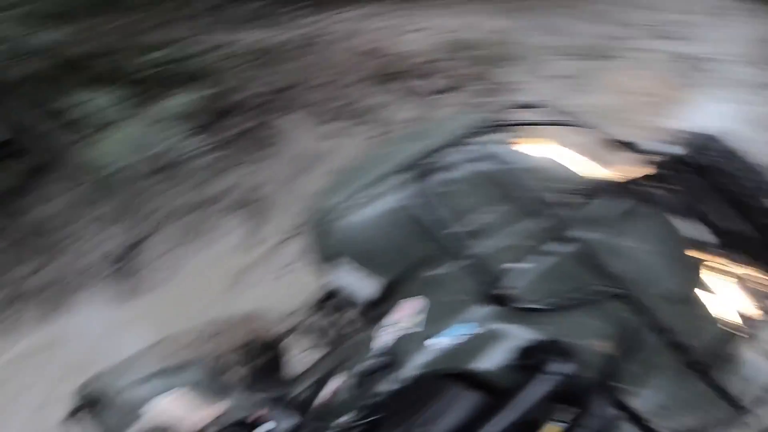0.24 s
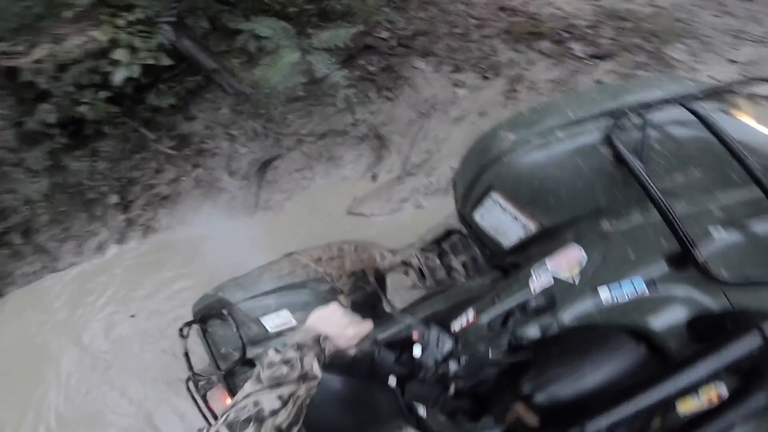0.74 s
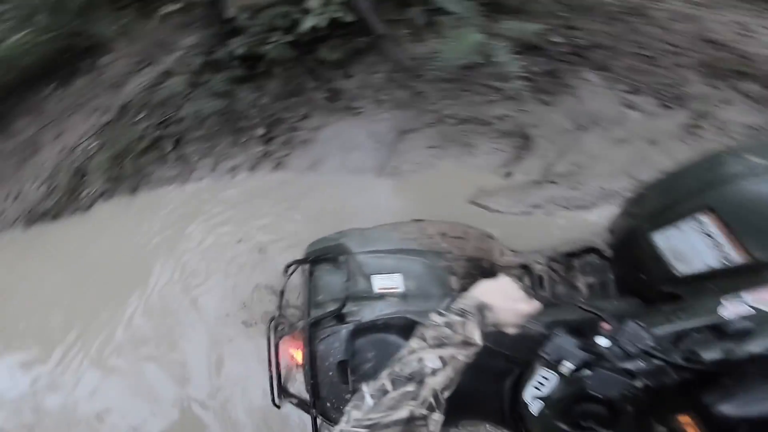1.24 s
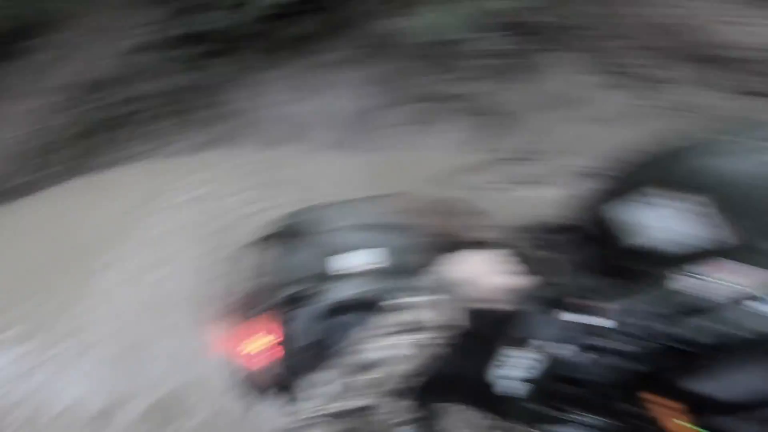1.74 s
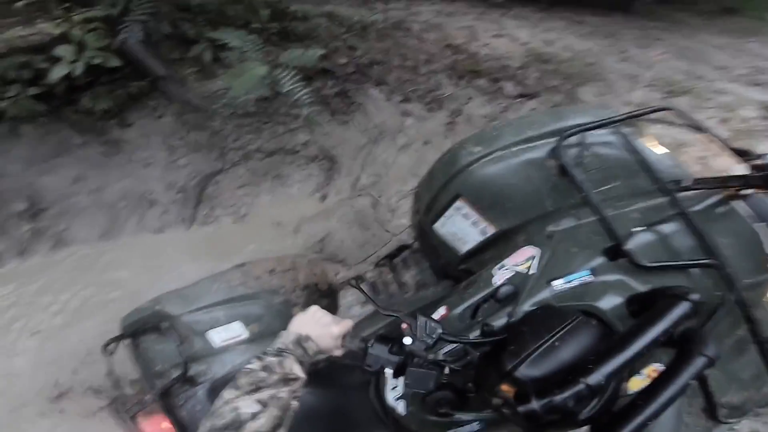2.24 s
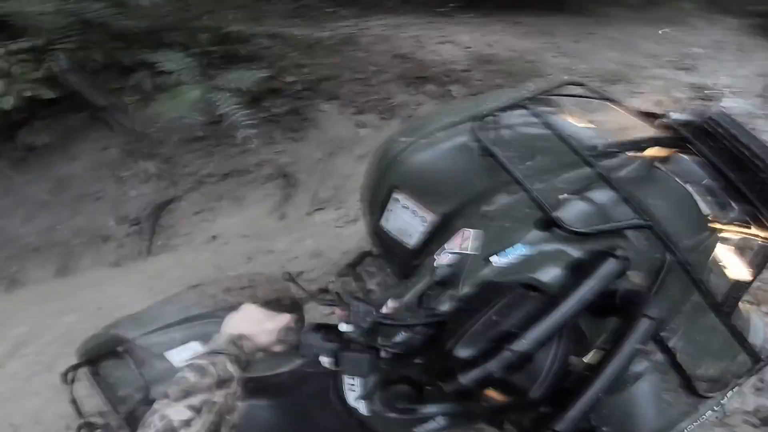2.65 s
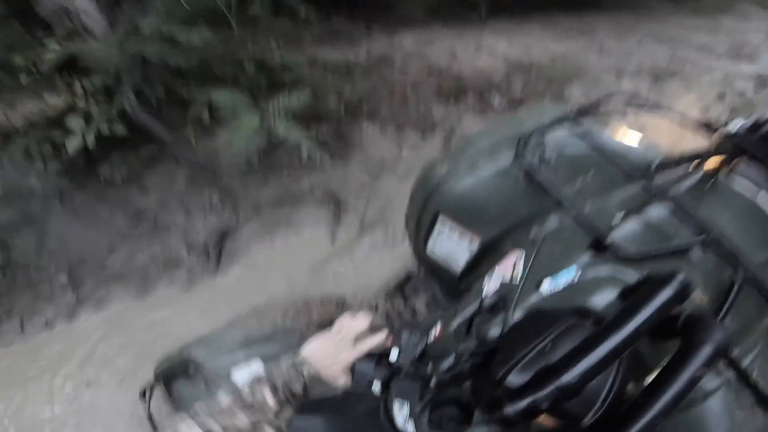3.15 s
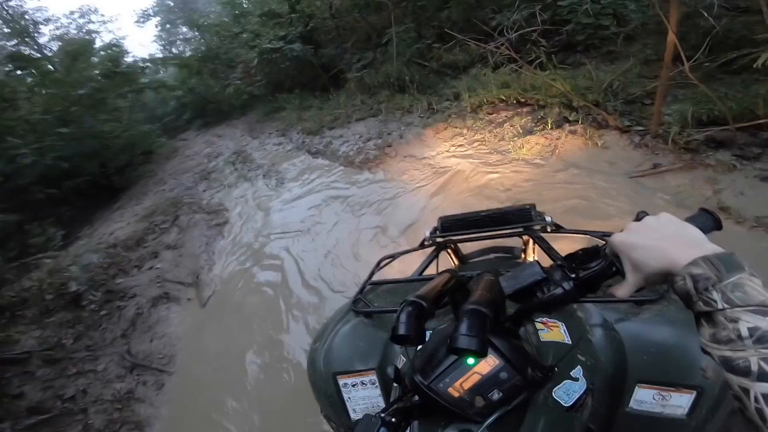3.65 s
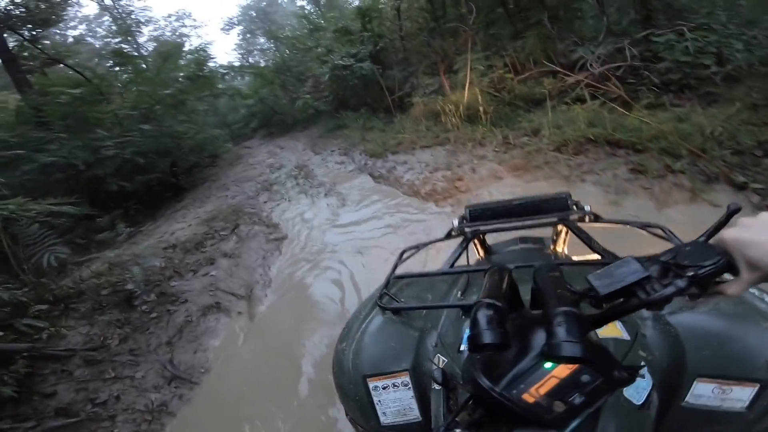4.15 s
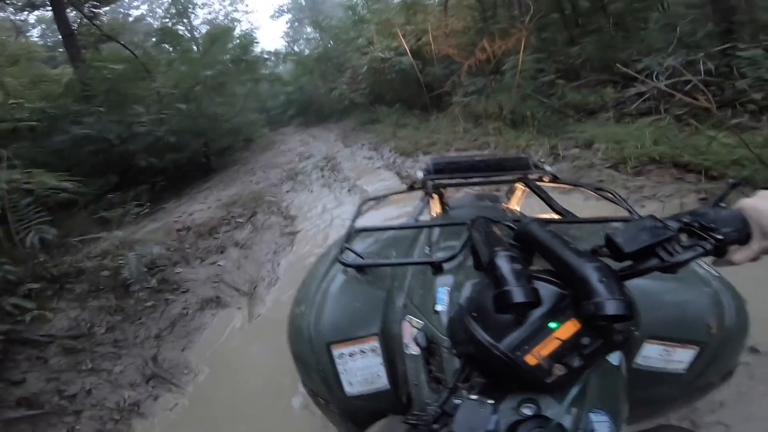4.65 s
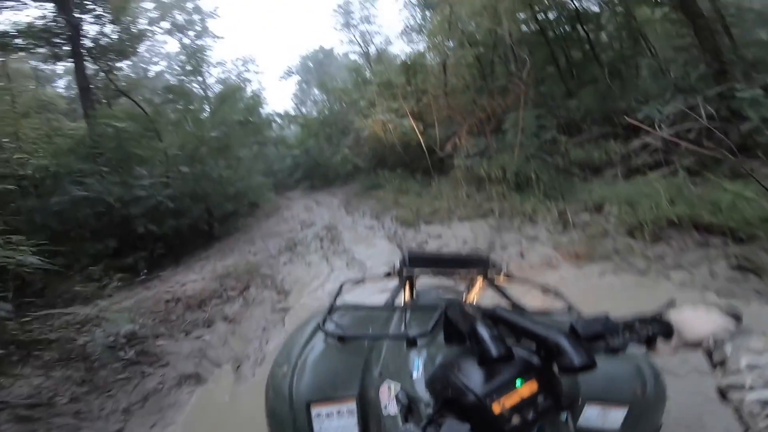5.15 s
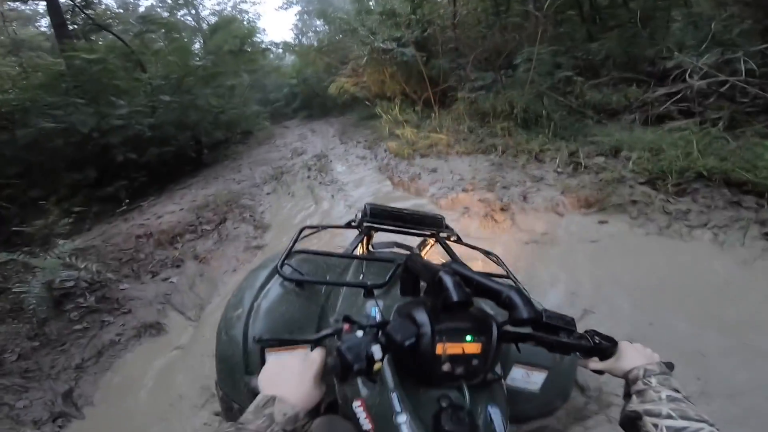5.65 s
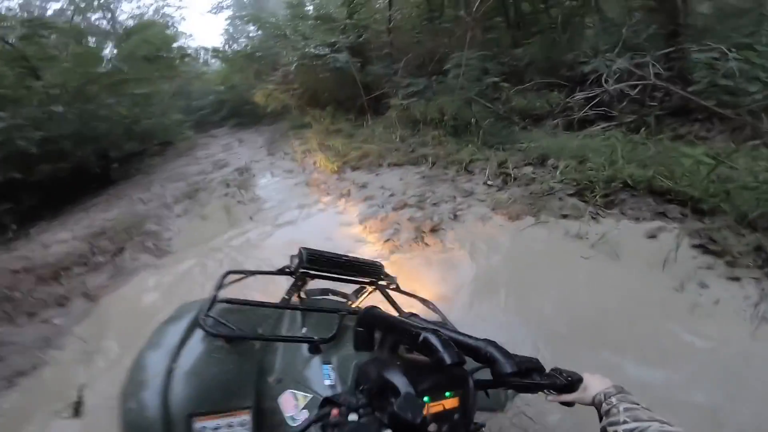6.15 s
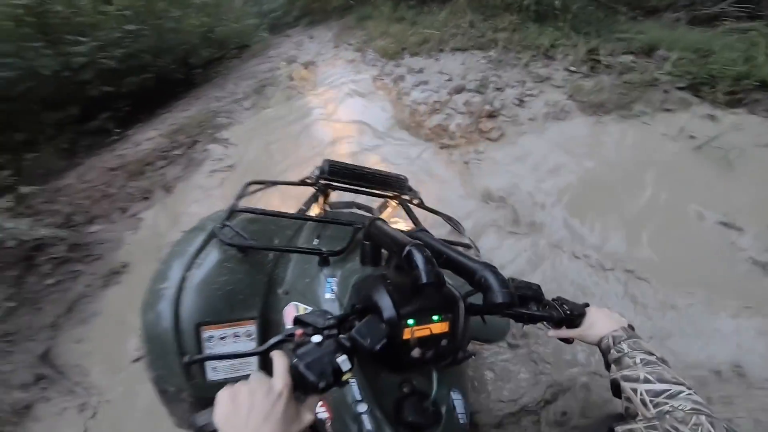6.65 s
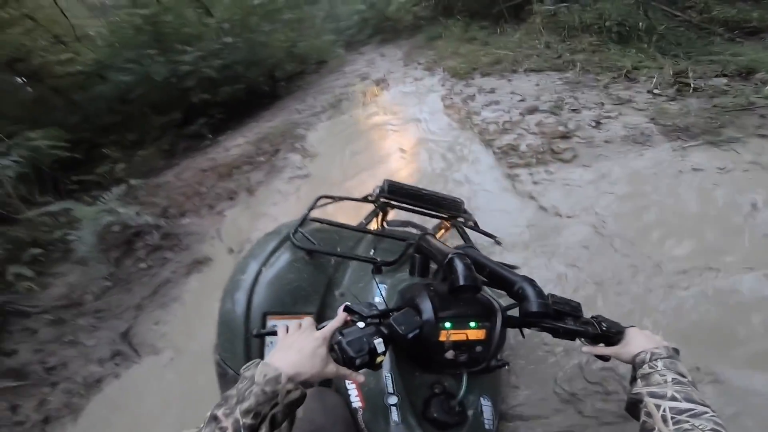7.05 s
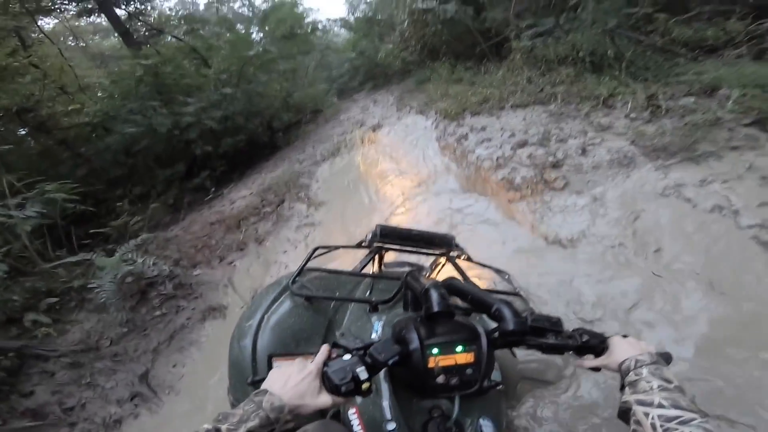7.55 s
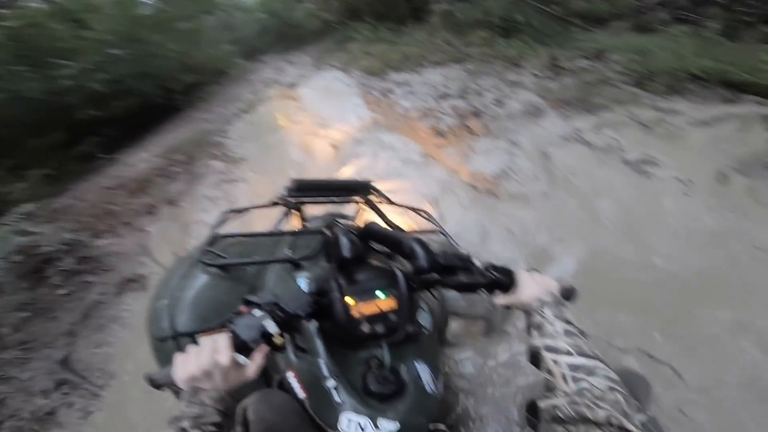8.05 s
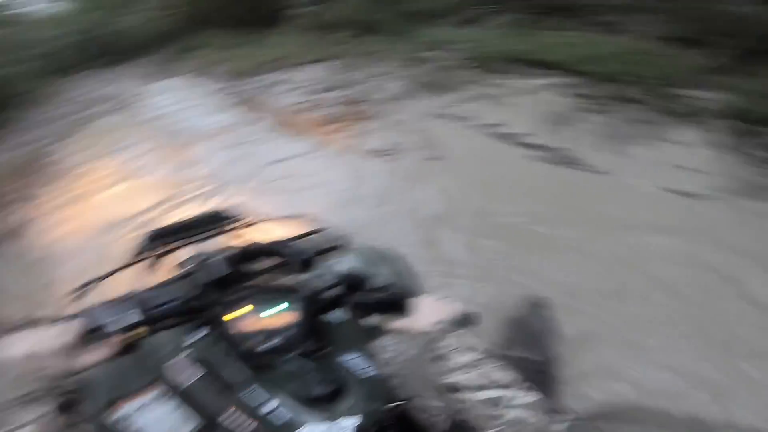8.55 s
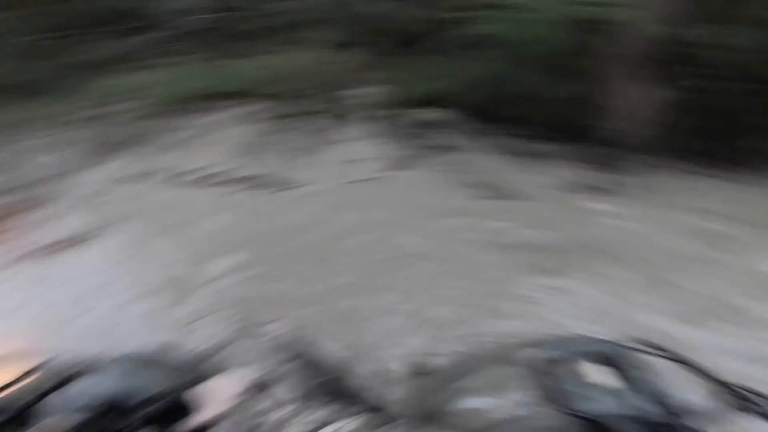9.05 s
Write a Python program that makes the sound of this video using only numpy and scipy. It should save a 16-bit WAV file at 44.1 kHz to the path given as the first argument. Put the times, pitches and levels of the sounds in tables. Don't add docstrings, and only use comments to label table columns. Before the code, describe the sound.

A small single-cylinder quad thumps and bubbles with its tailpipe underwater, chokes to a rough idle, then barks clear and putters gently through sloshing mud.

```python
import sys
import numpy as np
from scipy import signal
from scipy.fft import rfft, irfft, next_fast_len
from scipy.io import wavfile
from scipy.ndimage import uniform_filter1d, map_coordinates

SR = 44100
rng = np.random.default_rng(int(sys.argv[2]) if len(sys.argv) > 2 else 0)


def ratio(d):
    e = np.asarray(d, float) / 20
    return 10 ** e


def dump_mix(stems):
    frames = np.atleast_2d(stems).T
    limited = np.clip(frames, -1, 1)
    pcm = np.round(limited * 32767).astype(np.int16)
    wavfile.write(sys.argv[1], SR, pcm)


N = 410130

# [time_s, firings_per_s]
ENGINE_SPEED = [(-.0045, 19.227), (.576, 17.406), (2.121, 26.896), (2.257, 16.675), (2.711, 10.965),
                (3.676, 12.659), (3.681, 22.407), (4.186, 24.499), (4.315, 17.466), (4.676, 19.918),
                (4.751, 17.301), (5.184, 24.733), (5.437, 14.525), (6.383, 11.086), (7.701, 11.692),
                (7.901, 18.243), (8.647, 19.506), (9.33, 17.243)]
# [time_s, late_ms]
CRANK_HUNT = [(0, 0), (.05, -4), (.2, -1), (.35, 5), (.55, 2), (.72, -2), (.85, 1), (1.05, -2), (1.2, -3),
              (1.38, 3), (1.55, 0), (1.65, 3), (1.86, 2.5), (2, 0), (5.9, 0), (6.3, 3), (6.9, 2), (7.3, 0)]
# [time_s, late_ms, pitch_share]
HESITATIONS = [(2.09, 3, 1), (2.13, 4, 1), (2.17, 7, .78), (2.22, 16, 1), (2.41, -6, 1), (2.47, 0, 1),
               (2.54, 4, 1), (2.71, -2, 1), (2.8, -6, 1), (2.89, 10, 1), (3.7, -3, 1), (4.25, 0, .72),
               (4.31, -3, .9), (4.37, -3, .95), (4.475, 7, 1), (4.525, 5, 1), (5.21, 0, .8), (5.26, 8, 1),
               (5.48, 14, 1), (7.49, -5, 1), (7.58, -4, 1)]
# [open_s, shut_s, start_throttle, end_throttle], 0 idle, 1 cruise, 2 pull, 3 load
SQUEEZES = [
    (-.1, .89, 1.5, 1.5),
    (.89, 2.16, 2.3, 3.1),
    (3.66, 4.235, 2.6, 3.1),
    (4.45, 4.66, 1.7, 1.8),
    (4.82, 5.19, 1.9, 2.1),
    (7.71, 8.03, 1.3, 1),
    (8.03, 8.28, 1, 1),
    (8.28, 8.59, 1, 1),
    (8.59, 9.01, .95, .75),
    (9.01, 9.4, .7, .5),
]
# [from_s, to_s, share_0_to_1]
DROWNED = [
    (-.1, 3.66, 1),
    (5.19, 5.52, .25),
]
# [thump_peak_db, thump_drift_db, rush_db, rush_drift_db]
BLOW = [(-7, 4, -48, 6), (-3.5, 0.5, -42, -4), (-5.5, 0, -36.5, 4.5), (-4.5, 0.5, -38, -1),
        (-4.5, 0.5, -36.5, -0.5), (-3, -3, -37.5, -13), (-5, -1, -45.5, -2), (-6.5, 0.5, -45.5, -1.5),
        (-6.5, 0, -44, -0.5), (-6.5, -2, -46.5, -14.5), (-4.5, 0, -47.5, 0), (-8, 0, -54.5, 0)]
# [time_s, level_change_db, breakup_0_to_1]
STUMBLES = [(.765, -2.5, 0.6), (.82, 1.5, 0.8), (.97, 1.5, 0.7), (1.445, -2.5, 0.7), (1.12, -0.5, .85),
            (1.62, -3, 0.78), (1.78, -1, 0.58), (1.935, -3, .7), (2.135, -5.5, 0.62), (2.18, 16, 0),
            (2.23, -5.5, 0.7), (2.28, 8.5, 1), (2.335, 4, 0.83), (2.47, -4, 0.76), (2.41, -10.5, 0.7),
            (2.71, 2.5, 0.94), (2.79, 0.5, 0.47), (2.9, -1, .6), (3.31, -0.5, 0.6), (3.63, 1.5, 0.54),
            (5.26, -4.5, 0.9), (5.48, -8, 1)]
# [freq_hz, level_db_per_hz]
DRY_IDLE = [(15, -55.5), (25, -40.5), (50, -5), (68, 4), (82, 1), (95, 2.5), (118, -2.5), (140, 3.5),
            (165, -5.5), (182, -13), (215, -18), (260, -26), (400, -40), (700, -47.5), (1500, -120)]
DRY_CRUISE = [(15, -84), (25, -34), (50, -3.5), (62, -29.5), (80, 5), (115, 5), (180, 0.5), (208, -11.5),
              (235, -7.5), (290, -20.5), (365, -31), (450, -34), (650, -36.5), (900, -48), (1250, -47.5),
              (1900, -120)]
DRY_PULL = [(15, -95.5), (25, -38), (54, -23), (71, -8.5), (123, 1), (178, -8.5), (237, -13), (325, -16),
            (383, -35), (472, -20), (533, -34.5), (619, -30), (900, -43.5), (1170, -77), (1980, -120)]
DRY_LOAD = [(15, -53.5), (25, -20.5), (43, -18), (102, 1.5), (123, 4), (152, -3.5), (186, -19.5),
            (227, -9.5), (295, -26), (448, -10.5), (601, -26), (690, -24.5), (1000, -39), (1300, -67),
            (2200, -120)]
# [freq_hz, level_db_per_hz]
WET_GLUG = [(15, -68), (25, -11), (54, 7), (82, 1), (168, 7), (244, -13.5), (292, -12), (419, -10.5),
            (591, -31.5), (900, -30.5), (1170, -36), (1980, -120)]
WET_GURGLE = [(15, -39), (25, -15.5), (170, 6.5), (220, -4), (425, -4.5), (445, -32), (487, -40),
              (637, -47.5), (687, -29), (775, -41.5), (900, -26.5), (1170, -69), (1980, -120)]
WET_SPOUT = [(15, -45.5), (25, -14), (70, -7.5), (106, -1), (134, -3.5), (310, -8.5), (393, -17.5),
             (523, -13), (652, -26), (729, -25), (1100, -57), (1430, -58), (2420, -120)]
# [low_hz, high_hz, pitch_glide_share]
PIPE_RING_HZ = [(438, 680, 0), (525, 745, .02), (450, 760, .06), (320, 658, .03), (330, 640, .05),
                (285, 1125, .03), (350, 1110, .05), (378, 690, 0), (355, 735, -.06), (315, 690, -.05),
                (418, 600, 0), (320, 650, 0)]
# [low_db, high_db, t60_s]
PIPE_RING_DB = [(-22, -40, .15), (-20, -21, .04), (-30, -27, .06), (-30, -46, .07), (-30, -32, .07),
                (-28, -35, .06), (-23, -36, .06), (-23, -39, .065), (-21, -28, .06), (-32, -44, .06),
                (-24, -44, .12), (-54, -57, .05)]
# [freq_hz, level_db_per_hz]
GAS_COLOUR = [(530, -33), (900, -1), (1200, -2.5), (1550, -4), (2130, -7.5), (3310, -11), (4560, -15.5),
              (6930, -9.5), (10300, -33), (11200, -46), (14000, -28), (15600, -38.5)]
BURST_COLOUR = [(500, -32), (900, 4.5), (1600, 0.5), (3300, -9.5), (4500, -10.5), (6900, -8.5),
                (10500, -30.5), (14000, -31), (15700, -48.5)]
# [freq_hz, level_db]
PANEL_MODES = [(1160, 12), (2100, 1.5), (2950, 1), (3900, -7), (5200, -8.5), (5950, -1.5), (7000, -1),
               (7800, -14), (10200, -5)]
# [time_s, peak_db, t60_s, left_minus_right_db]
CLICKS = [
    (3.43, -28.5, 0.033, -1),
    (3.449, -43, 0.073, -2),
    (6.123, -60, 0.13, 3),
    (6.4393, -49, 0.37, -16),
    (6.805, -38, 0.14, 13.5),
    (7.2629, -47, 0.059, 1),
    (7.319, -47.5, 0.039, -5.5),
    (7.6928, -21.5, 0.055, 1),
]
# [freq_hz, level_db]
CLICK_COLOUR = [(700, -34), (1500, -11.5), (3500, -2.5), (7500, 3), (11000, -11.5), (14000, -13.5),
                (15800, -47.5), (17000, -120)]
# [freq_hz, level_db, t60_s]
LEVER_MODES = [(2390, -9, .03), (3570, -6, .02), (3830, -9, .025), (5000, -3, .015), (5420, -9, .03),
               (7540, 3, 0.05), (10880, -5, 0.04), (13100, -17, .04)]
# [time_s, level_db,
# pitch_hz, t60_s]
MUD_SLAPS = [(3.154, -34.5, 1460, 0.28), (3.211, -27, 1510, 0.13), (3.333, -34, 1470, 0.39),
             (3.389, -36.5, 2320, 0.19), (3.553, -38, 2330, 0.17), (3.63, -38.5, 2470, 0.48),
             (5.665, -33, 570, 0.042), (6.122, -35, 2930, 0.052), (6.34, -35, 1270, 0.3),
             (6.322, -32, 399, 0.065), (6.549, -36.5, 430, 0.12), (6.447, -32.5, 1130, 0.22),
             (6.575, -37.5, 390, 0.15), (6.745, -34, 373, .06), (6.611, -37, 1700, 0.038),
             (6.742, -32, 1476, 0.042), (7.06, -54, 587, .6), (7.299, -48.5, 655, 0.92),
             (2.299, -52, 1490, .5), (2.45, -47, 1960, 0.43), (7.519, -46, 1770, 0.35),
             (7.573, -41, 1846, 0.081), (7.7, -45.5, 2420, .3), (7.738, -35, 1213, 0.063)]
# [time_s, fizz_db]
WHEEL_CHURN = [(0, -62), (1.35, -64.5), (1.94, -57), (2.5, -58), (2.92, -70), (3.29, -62), (3.52, -65.5),
               (3.75, -54.5), (4.12, -51.5), (4.28, -57.5), (5.93, -62.5), (6.4, -58.5), (6.8, -56),
               (6.95, -65.5), (7.45, -67), (7.7, -63.5), (8.85, -61), (9.3, -61.5)]
# [freq_hz, level_db_per_hz]
SLOSH_COLOUR = [(150, -21), (250, -13), (358, -3.5), (586, -14), (678, -11.5), (816, -14), (1490, -18.5),
                (4250, -30), (6000, -36.5), (7800, -62), (13200, -120)]
FIZZ_COLOUR = [(2350, -3.5), (4000, -6.5), (4800, -8.5), (6170, 5), (7500, 2.5), (11300, -16.5),
               (13700, -18.5), (15100, -51.5), (15700, -62)]
SHUDDER_COLOUR = [(15, -26.5), (30, -27.5), (60, -7), (200, -0.5), (400, -41), (800, -120)]
AIR_COLOUR = [(2000, -35.5), (4000, -4), (9000, 0.5), (13000, -2.5), (15500, -19)]
PORT_WIND_COLOUR = [(12, -30), (25, -3), (45, 0), (60, -10), (85, -120)]
# [freq_hz, likeness_0_to_1]
PORT_LIKENESS = [(30, .6), (150, 1), (380, 1), (950, 0.14), (2380, 1), (5980, 0.26), (15000, 0.11)]
# [freq_hz, left_minus_right_db]
PORT_LEAN = [(40, 0), (90, -.4), (170, -.9), (350, -2.8), (650, -5.5), (1400, -3), (2800, -2), (5600, -1.8),
             (9500, -4.3), (14000, -1.5)]
# [freq_hz, lead_rad]
PORT_LEAD = [(0, -0.5), (690, 0.3462), (1030, 1.33), (1460, 1.0), (2500, 1.59), (4390, -1.43), (7840, -2),
             (9560, -2.5), (12600, -7), (15400, -9.5)]

CHOKE_DB = -14


def firings():
    s = ENGINE_SPEED[0][0] + np.arange(N + SR // 50) / SR
    count = np.cumsum(curves(ENGINE_SPEED, s)[0]) / SR
    at = np.interp(np.arange(count[-1]), count, s)
    at = at + curves(CRANK_HUNT, at)[0] / 1000
    for s, late_ms, share in HESITATIONS:
        at[np.argmin(abs(at - s))] += late_ms / 1000
    return at


def hand(at):
    overrun, overrun_s = .6, .3
    opens, shuts, first, last = np.transpose(SQUEEZES)
    k = np.searchsorted(opens, at) - 1
    since = at - shuts[k]
    part = (at - opens[k]) / (shuts[k] - opens[k]) * (since < 0)
    wet = sum(share * (at > a) * (at < b) for a, b, share in DROWNED)
    squeezed = first[k] + (last[k] - first[k]) * part
    throttle = np.where(since < 0, squeezed, overrun * np.exp(-abs(since) / overrun_s))
    row = np.where(since < 0, k, len(opens) + (wet < .5))
    return throttle, wet, row, part, since


def breakup(at):
    torn_power, torn_third, torn_even, torn_odd = 0.41, 0.66, 0.86, 0.6
    third_db, even_db, calm_hz, choke_s = -3.5, -3.5, 22.43, 0.93
    throttle, wet, row, part, since = hand(at)
    start_db, drift_db = np.transpose(BLOW)[:2, row]
    count = np.arange(len(at))
    third = (count % 3 == 0) & (curves(ENGINE_SPEED, at)[0] < calm_hz) & (since < 0) & (wet > .5)
    idling = (since > 0) & (wet > .5)
    even = idling & (count % 2 == 0)
    choke_db = idling * CHOKE_DB * np.exp(-abs(since) / choke_s)
    peak_db = start_db + drift_db * part + third_db * third + even_db * even + choke_db
    torn = np.select([third, even, idling], [torn_third, torn_even, torn_odd], torn_power)
    for s, change_db, share in STUMBLES:
        nearest = np.argmin(abs(at - s))
        peak_db[nearest] += change_db
        torn[nearest] = share
    return peak_db, np.clip(torn, 0, 1)


def thump(spectrum, lag_hz, order, leak, turn):
    hz = np.fft.rfftfreq(2 ** 15, 1 / SR)
    gain = ratio(along(spectrum, hz))
    cepstrum = irfft(np.log(np.maximum(gain, 1e-3)))
    cepstrum *= np.r_[1, np.full(2 ** 14 - 1, 2), np.zeros(2 ** 14)]
    lag = ((lag_hz - 1j * hz) / (lag_hz + 1j * hz)) ** order
    detour = np.exp(-2j * np.pi * hz * .0027)
    baffle = (leak + detour) / (1 + leak * detour)
    delay = np.exp(-1j * (turn + 2 * np.pi * hz * .02))
    pulse = irfft(np.exp(rfft(cepstrum)) * lag * baffle * delay * (gain > 1e-4))[:SR // 5]
    pulse = (-1) ** order * pulse / np.abs(pulse).max()
    smooth = uniform_filter1d(pulse, size=90)
    trough = signal.find_peaks(-smooth, height=-.45 * smooth.min())[0][0]
    return lambda t: np.interp(t * SR + trough, np.arange(len(pulse)), pulse, 0, 0)


def blend(shapes, place, t):
    place = np.clip(place, 0, len(shapes) - 1)[:, None]
    return sum(np.clip(1 - abs(place - k), 0, 1) * shape(t) for k, shape in enumerate(shapes))


def drowned_thumps(t, throttle, torn, slack, luck):
    breach_s, breach_rise_s, breach_slow = .0055, .0029, 1.5
    held_from, held_db = .55, -22
    gulps = [thump(c, 40, order=1, leak=.3, turn=1) for c in (WET_GLUG, WET_GURGLE, WET_SPOUT)]
    gaps = np.interp(throttle, [0, 3], [.0085, .0068])[:, None] * (1 + 0.199 * luck[:, 1:5])
    late = np.cumsum(gaps, axis=1) - gaps[:, :1] + 0.00089
    sizes = torn[:, None] ** np.arange(4) * ratio(2.5 * luck[:, 5:9] * (np.arange(4) > 0))
    sizes[:, 0] *= ratio(held_db * np.clip(torn - held_from, 0, 1))
    out = 0
    for k in range(4):
        gulp_t = (t - late[:, [k]]) * slack * (1 + 0.054 * luck[:, [9 + k]])
        out = out + sizes[:, [k]] * blend(gulps, throttle / 1.417, gulp_t)
    slowing = (1 + breach_slow * np.clip(1 - throttle, 0, 1))[:, None]
    breach = np.clip((t / slowing + breach_s) / breach_rise_s, 0, 1)
    out = out * np.sin(np.pi / 2 * breach) ** 2
    out = out / np.abs(out).max(axis=1, keepdims=True)
    return out - 0.22 * out ** 2


def exhaust(at):
    steadies = .2
    (peak_db, torn), (throttle, wet) = breakup(at), hand(at)[:2]
    wet = wet[:, None]
    luck = rng.standard_normal((len(at), 14))
    luck[:, 1:13] *= 1 - steadies * np.clip(throttle - 1, 0, 2)[:, None]
    t = np.arange(-SR // 30, SR // 8) / SR
    slack = np.ones((len(at), 1))
    for s, late_ms, share in HESITATIONS:
        slack[np.argmin(abs(at - s))] = share
    pipes = [thump(DRY_IDLE, 80, order=4, leak=.1, turn=.85)]
    pipes += [thump(c, 40, order=1, leak=.3, turn=1.8) for c in (DRY_CRUISE, DRY_PULL, DRY_LOAD)]
    dry = blend(pipes, throttle, t * slack * (1 + 0.036 * luck[:, :1]))
    drowned = drowned_thumps(t, throttle, torn, slack, luck)
    fade = np.clip((t[-1] - t) / .03, 0, 1)
    size = ratio(peak_db + (0.13 + 0.28 * wet[:, 0]) * luck[:, 13])[:, None]
    return laid(size * ((1 - wet) * dry + wet * drowned) * fade, at + t[0])


def tailpipe_ring(at):
    grows_db = 9
    after_ring_db, after_ring_s, after_swell_s = 50, 0.49, 0.034
    clears_s = 1
    wet_detune, wet_scatter_db = .04, 2.5
    belly_hz, belly_db, belly_s, belly_fades_db = 182, -15, .2, -8
    throttle, wet, row, part, since = hand(at)
    low_hz, high_hz, glide = np.transpose(PIPE_RING_HZ)[:, row]
    low_db, high_db, t60 = np.transpose(PIPE_RING_DB)[:, row]
    last = np.transpose(SQUEEZES)[3, np.minimum(row, len(SQUEEZES) - 1)]
    after_swell = np.exp(-abs(since) / after_ring_s) * (1 - np.exp(-abs(since) / after_swell_s))
    after_db = after_ring_db * np.logical_not(wet) * after_swell
    choke_db = CHOKE_DB * (wet > .5) * np.exp(-abs(since) / clears_s)
    low_db = low_db + np.where(since < 0, grows_db * (throttle - last), after_db + choke_db)
    luck = rng.standard_normal((len(at), 3))
    t = np.arange(SR // 12) / SR
    drift = (1 + (glide * part)[:, None] + 0.018 * luck[:, :1]) * t
    low = ratio(low_db + 0.37 * luck[:, 1])[:, None] * np.sin(2 * np.pi * low_hz[:, None] * drift)
    detune = 1 + wet_detune * wet[:, None] * luck[:, 1:2]
    high_size = ratio(high_db + (2 + wet_scatter_db * wet) * luck[:, 2])[:, None]
    high = high_size * np.sin(2 * np.pi * high_hz[:, None] * drift * detune)
    end = 1 - t / t[-1]
    swell = (1 - np.exp(-t / (0.0053 - 0.001 * wet[:, None]))) * ratio(-60 * t / t60[:, None]) * end
    belly_size = (ratio(belly_db + belly_fades_db * abs(throttle - 1.5)) * wet)[:, None]
    belly = belly_size * np.sin(2 * np.pi * belly_hz * drift)
    belly = belly * (1 - np.exp(-t / 0.0086)) * ratio(-60 * t / belly_s) * end
    return laid(swell * (low + high) + belly, at - .004 + 0.002976 * wet)


def heave(at):
    heave_hz, heave_db, heave_s, fades_db = 53.9, -19, 0.2, -5.5
    surge_db = 2.5
    throttle, wet = hand(at)[:2]
    t = np.arange(SR // 10) / SR
    push = np.sin(2 * np.pi * heave_hz * t) * (1 - np.exp(-t / 0.0018)) * ratio(-60 * t / heave_s)
    size_db = heave_db + fades_db * abs(throttle - 1) + surge_db * (wet < .5)
    size = ratio(size_db + 2 * rng.standard_normal(len(at))) * (wet > 0)
    return laid(size[:, None] * push / push.max(), at - .002)


def gas(at):
    pop_db, pop_s, pop_scatter_db = 9, .014, 2.5
    spit_db, spit_at_s, spit_wide_s = 9.5, 1.66, .25
    valve_db, valve_s = -1.5, .025
    throttle, wet, row, part, since = hand(at)
    start_db, drift_db = np.transpose(BLOW)[2:, row]
    rush_db = (start_db + drift_db * part)[:, None]
    t = np.arange(SR // 10) / SR
    luck = rng.standard_normal((len(at), 2))
    puff = (1 - np.exp(-t / 0.0035)) * (ratio(-60 * t / 0.12) + 0.41 * np.exp(-(t / 0.011) ** 2))
    crack = (.5 * np.clip(wet, 0, 1) * throttle)[:, None] * ratio(luck[:, 1:] - 60 * (t / 0.041) ** 2)
    crack = crack * (1 - np.exp(-t / 0.00029))
    spit = spit_db * np.exp(-((at[:, None] - spit_at_s) / spit_wide_s) ** 2)
    crack = crack * (1 + ratio(pop_db + spit + pop_scatter_db * luck[:, :1] - 60 * t / pop_s))
    tick = (1 - wet)[:, None] * ratio(valve_db + 2 * luck[:, 1:] - 60 * t / valve_s)
    tick = tick * (1 - np.exp(-t / .001))
    size = ratio(rush_db + 1.2 * luck[:, :1])
    puffs, cracks, ticks = [laid(size * shape, at - .004 + 0.0019 * wet) for shape in (puff, crack, tick)]
    out = puffs * rush(GAS_COLOUR, patchy_db=3) + cracks * rush(BURST_COLOUR, patchy_db=4)
    return out + ticks * rush(FIZZ_COLOUR, patchy_db=4)


def panels(at):
    panel_db, panel_s, scatter_db, blur_rad, wet_db = -2, .05, 5, .06, 5
    throttle, wet, row, part, since = hand(at)
    start_db, drift_db = np.transpose(BLOW)[2:, row]
    shake_db = (start_db + drift_db * part + panel_db + wet_db * wet)[:, None]
    t, out = np.arange(SR // 30) / SR, 0
    for hz, db in PANEL_MODES:
        luck = rng.standard_normal((len(at), 4))
        size = ratio(shake_db + db - 10.5 + scatter_db * np.clip(luck[:, :1], -2, 1.7))
        blur = blur_rad * np.cumsum(rng.standard_normal((len(at), len(t))), axis=1)
        ring = size * np.sin(2 * np.pi * hz * (1 + 0.055 * luck[:, 1:2]) * t + blur)
        ring = ring * ratio(-60 * t / panel_s) * (1 - np.exp(-t / 0.0017))
        starts = at - .003 + .004 * abs(luck[:, 2])
        out = out + np.array([laid(ring * ratio(side * luck[:, 3:]), starts) for side in (2, -2)])
    return out


def knocks():
    ticks, out, t = np.zeros((2, N + SR)), np.zeros((2, N + SR)), np.arange(SR // 5) / SR
    for s, db, t60, pan_db in CLICKS:
        crack = ratio(db - 60 * t / min(t60, .035)) * rng.standard_normal((2, len(t)))
        ticks[:, round(s * SR):][:, :len(t)] += crack * ratio([[pan_db / 2], [-pan_db / 2]])
    ring = sum(ratio(level - 60 * t / t60) * np.sin(2 * np.pi * hz * t) for hz, level, t60 in LEVER_MODES)
    out[:, round(CLICKS[-1][0] * SR):][:, :len(t)] += ratio(-29.0) * ring
    for s, db, hz, t60 in MUD_SLAPS:
        band = signal.butter(2, [hz / 7.1, hz * 1.5], "band", fs=SR)
        splat = unit(signal.lfilter(*band, rng.standard_normal((2, len(t)))))
        shape = ratio(db - 60 * t / t60) * (1 - np.exp(-t / (0.02 * t60)))
        out[:, round(s * SR):][:, :len(t)] += shape * splat
        out[:, :N] += bubbles(s, db, hz, t60)
    return out[:, :N] + filtered(ticks[:, :N], lambda hz: ratio(along(CLICK_COLOUR, hz)))


def bubbles(s, db, hz, t60):
    bubble_db, cycles, spread = -1, 15, .45
    when, pitch, size, side = rng.random((24, 4)).T[:, :, None]
    t = np.arange(SR // 30) / SR
    tone_hz = hz * np.exp(spread * 4 * (pitch - .5))
    life = t * tone_hz / cycles
    late = 0.36 * t60 * when
    tones = ratio(db + bubble_db - 60 * late / t60 - 10 * size)
    tones = tones * np.sin(2 * np.pi * tone_hz * t * (1 + 0.092 * life))
    tones = tones * life * np.exp(1 - 2 * life) * (1 - t / t[-1])
    return np.array([laid(tones * 2 * pan, s + late[:, 0]) for pan in (side, 1 - side)])


def spray():
    when, pitch, size, side = rng.random((1500, 4)).T
    hz = (1500 * 6 ** pitch)[:, None]
    t = np.arange(SR // 100) / SR
    drops = ratio(-4 * np.log(size + 0.08))[:, None] * np.sin(2 * np.pi * hz * t)
    drops = drops * np.exp(-t * hz / 4) * (1 - t / t[-1])
    return unit(np.array([laid(drops * pan[:, None], when * N / SR) for pan in (side, 1 - side)]))


def mud():
    slosh_level_db, slosh_grows, deep_db, shallow_s, shallow_db = -48.5, 0.58, 2, 7, -4.5
    now = np.arange(N) / SR
    fizz_db, wet = curves(WHEEL_CHURN, now)[0], water(now)
    shallow = np.clip((now - shallow_s) / 0.019, 0, 1)
    slosh_db = slosh_level_db + slosh_grows * (fizz_db - fizz_db.mean())
    slosh_db = slosh_db + deep_db * wet + shallow_db * shallow
    slosh = ratio(slosh_db + 4 + 1.5 * wobble(18)) * rush(SLOSH_COLOUR, patchy_db=2.5)
    fizz = ratio(fizz_db + 4.5 + 2.4 * wobble(13)) * rush(FIZZ_COLOUR, patchy_db=2.5)
    return slosh + fizz + ratio(fizz_db - 4.5) * spray()


def water(now):
    return uniform_filter1d(hand(now)[1], size=SR // 10)


def shudder():
    level = ratio(-47 + 8 * water(np.arange(N) / SR) + 2 * wobble(6))
    return level * rush(SHUDDER_COLOUR, patchy_db=1) * ratio(2 * np.array([wobble(30), wobble(30)]))


def wind_and_air():
    buffet = filtered(rng.standard_normal((2, N)), lambda hz: ratio(along(PORT_WIND_COLOUR, hz)))
    return ratio(-48 + 2 * wobble(2.8)) * unit(buffet) + ratio(-78) * rush(AIR_COLOUR, patchy_db=5.0)


def rush(spectrum, patchy_db):
    z = signal.stft(rng.standard_normal((2, N)), nperseg=256)[2]
    field = uniform_filter1d(rng.standard_normal(z.shape[1:]), size=5, axis=0)
    field = uniform_filter1d(field, size=6, axis=1)
    pair = signal.istft(z * ratio(patchy_db * unit(field)), nperseg=256)[1][:, :N]

    def colour(hz):
        angle = np.arccos(np.clip(along(PORT_LIKENESS, hz), 0, 1)) / 2
        return ratio(along(spectrum, hz)) * [np.cos(angle), np.sin(angle)]

    mid, side = filtered(pair, colour)
    return unit(np.array([mid + side, mid - side]))


def unit(x):
    return x / np.sqrt(np.mean(x ** 2) + 1e-20)


def along(points, hz):
    f, v = np.transpose(points)
    return np.interp(np.log(hz + 1), np.log(f + 1), v)


def curves(rows, at):
    s, *cols = np.transpose(rows)
    return [np.interp(at, s, c) for c in cols]


def wobble(rate):
    knots = rng.standard_normal(int(N * rate / SR) + 4)
    return map_coordinates(knots, [np.arange(N) * rate / SR])


def filtered(x, response):
    m = next_fast_len(N + SR // 2)
    return irfft(rfft(x, m) * response(np.fft.rfftfreq(m, 1 / SR)), m)[..., :N]


def laid(rows, starts):
    where = np.round(starts * SR).astype(int)[:, None] + np.arange(rows.shape[1])
    keep = (where >= 0) & (where < N)
    return np.bincount(where[keep], rows[keep], N)


def scene():
    at = firings()
    mix = exhaust(at) + tailpipe_ring(at) + heave(at) + gas(at) + panels(at)
    mix = mix + knocks() + mud() + shudder() + wind_and_air()
    halves = np.array([[.5], [-.5]])

    def ports(hz):
        return ratio(along(PORT_LEAN, hz) * halves) * np.exp(1j * along(PORT_LEAD, hz) * halves)

    return filtered(mix, ports)


def low_pass(x):
    return signal.sosfilt(signal.butter(12, 15820, fs=SR, output="sos"), x)


def record(dry):
    top, knee = 1, 4
    x = filtered(dry, lambda hz: hz ** 4 / (hz ** 4 + 26 ** 4))
    x = x / (1 + abs(x / top) ** knee) ** (1 / knee)
    return low_pass(x)


dry = scene()
out = record(dry)
dump_mix(out)
```